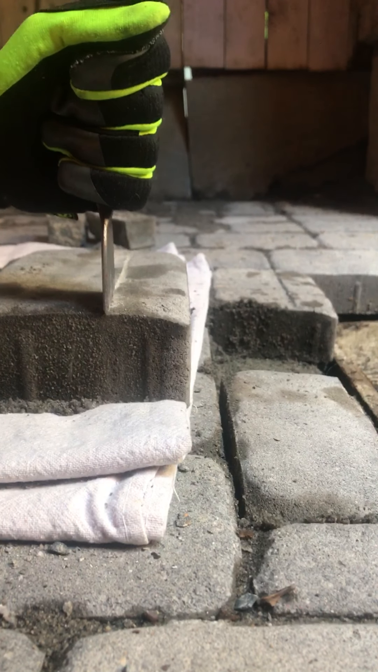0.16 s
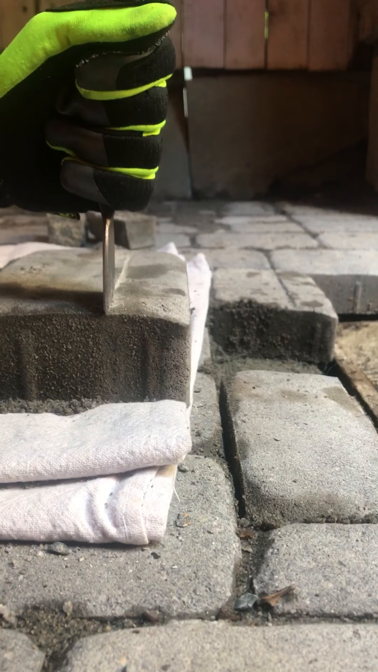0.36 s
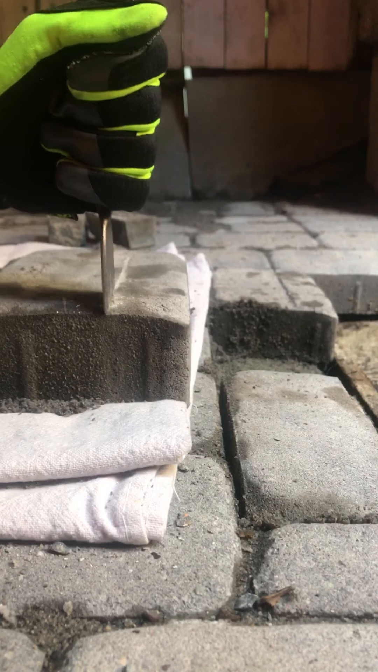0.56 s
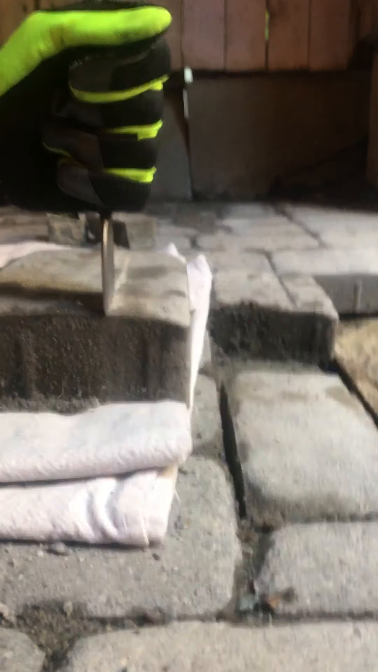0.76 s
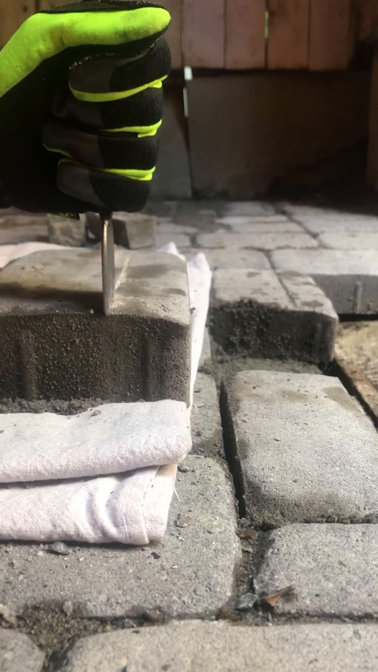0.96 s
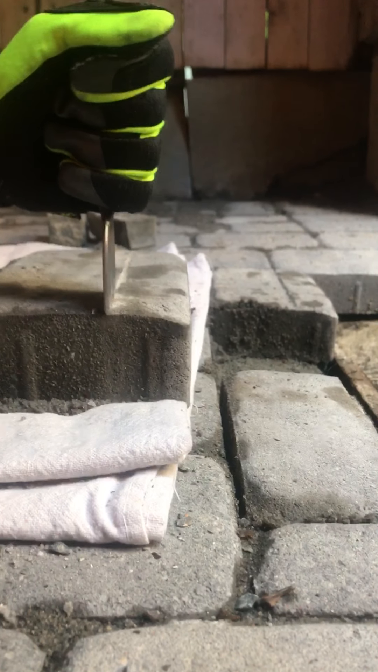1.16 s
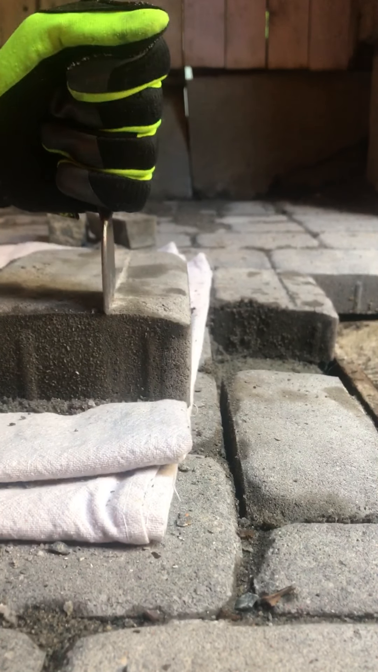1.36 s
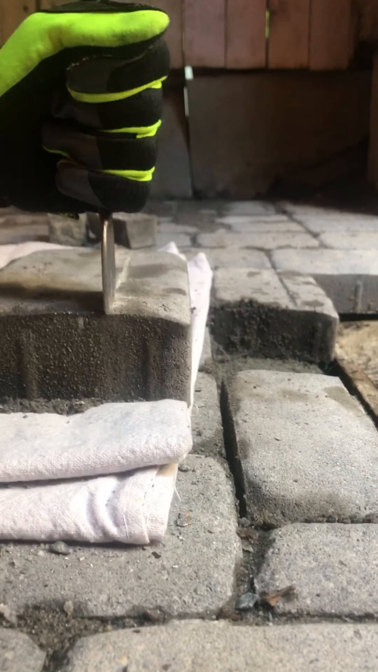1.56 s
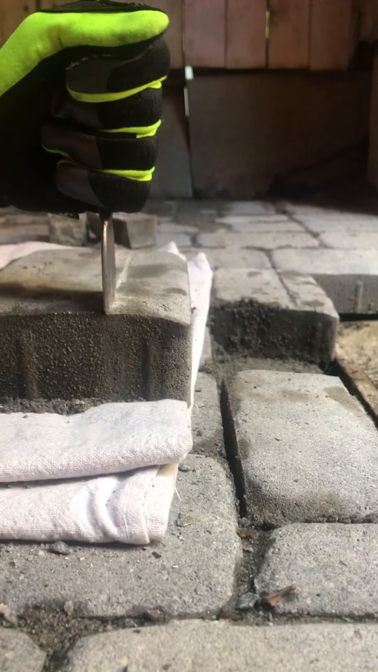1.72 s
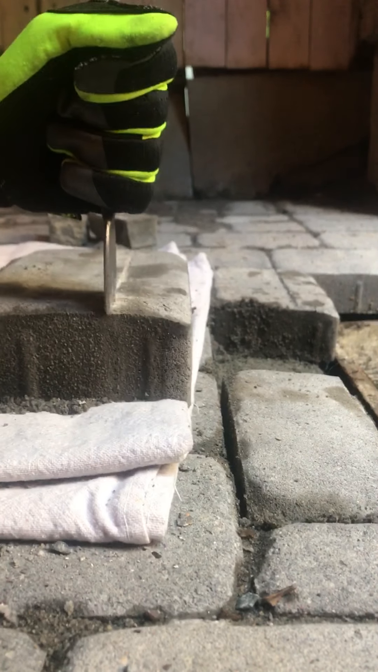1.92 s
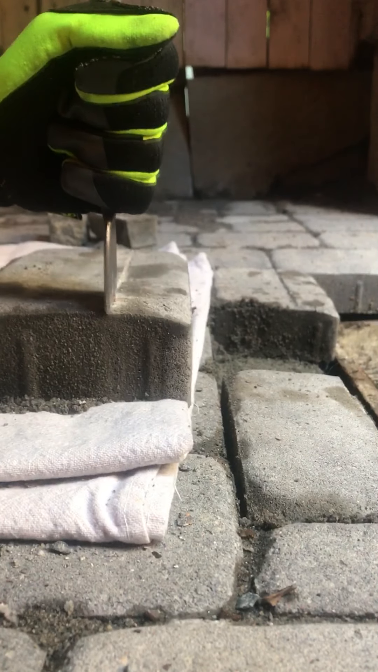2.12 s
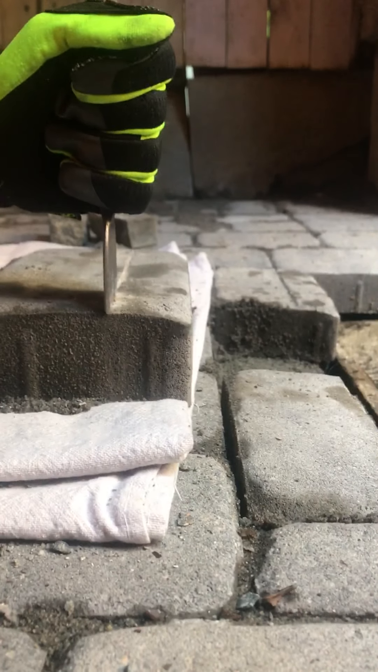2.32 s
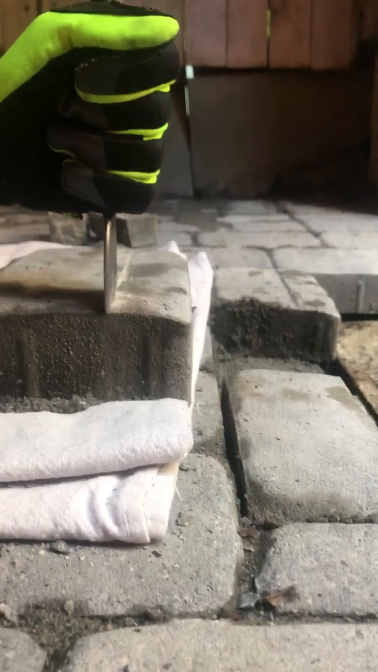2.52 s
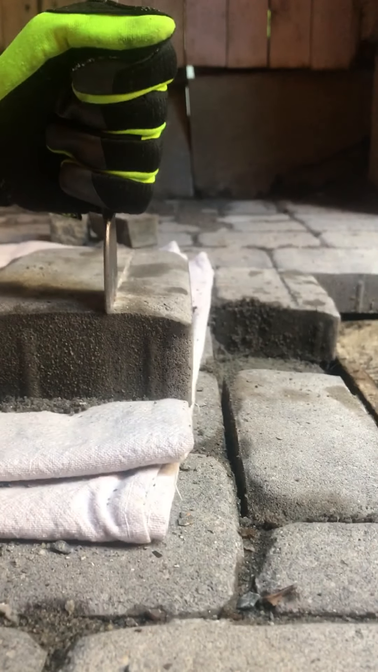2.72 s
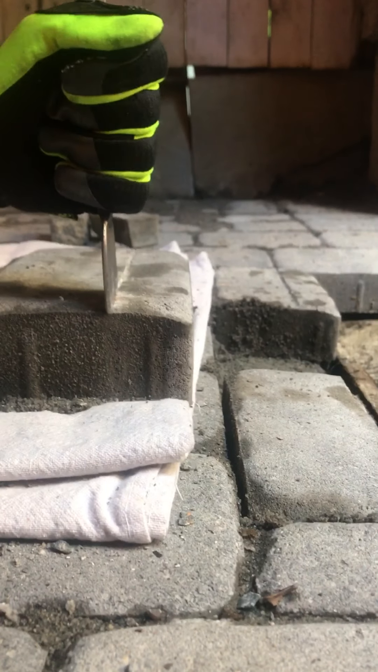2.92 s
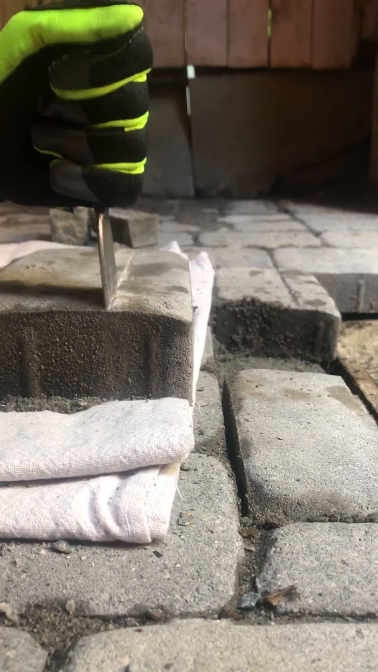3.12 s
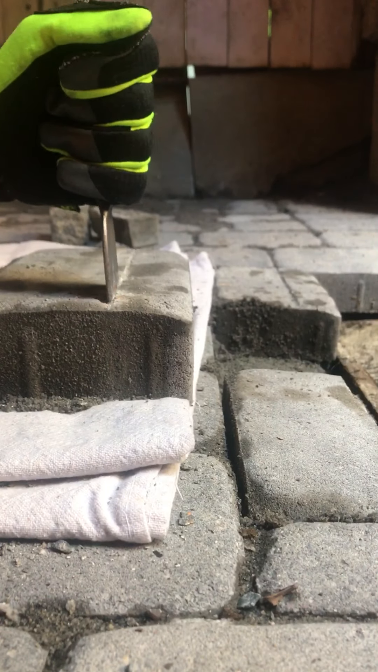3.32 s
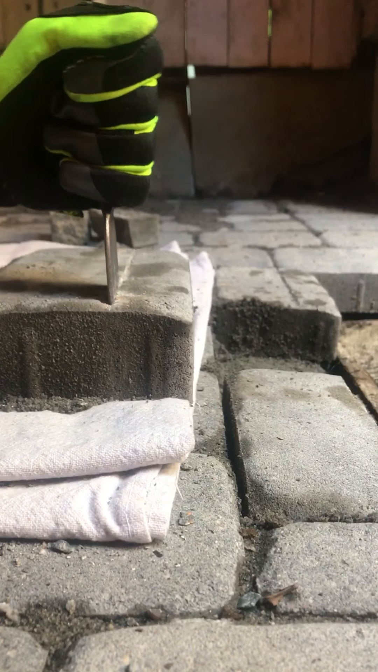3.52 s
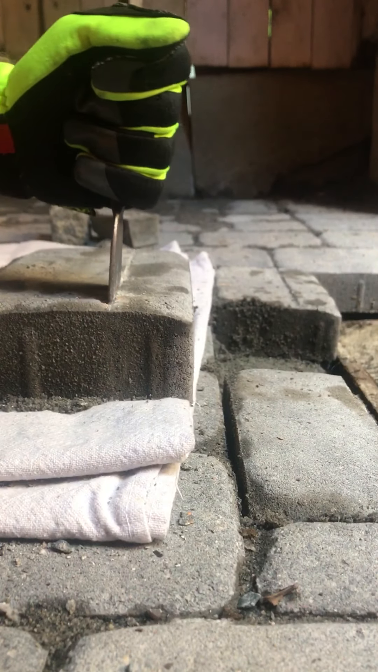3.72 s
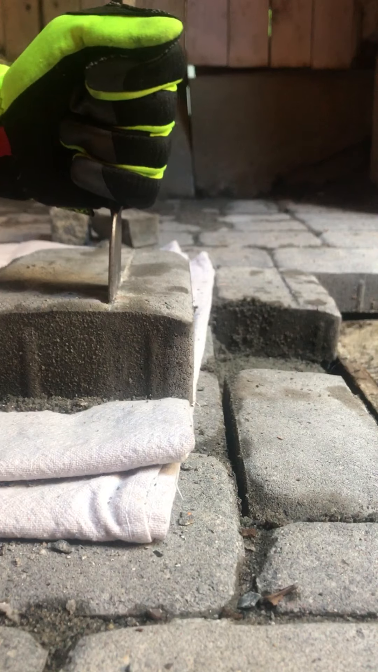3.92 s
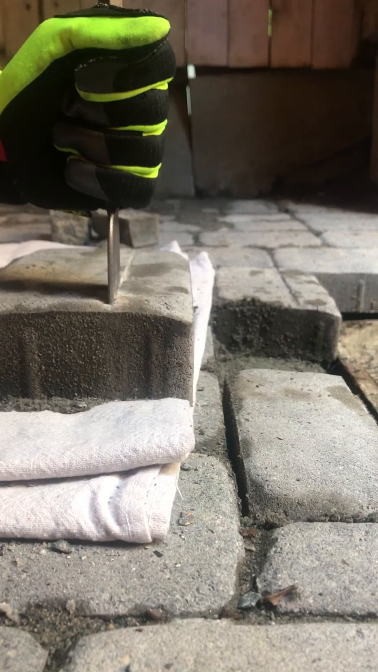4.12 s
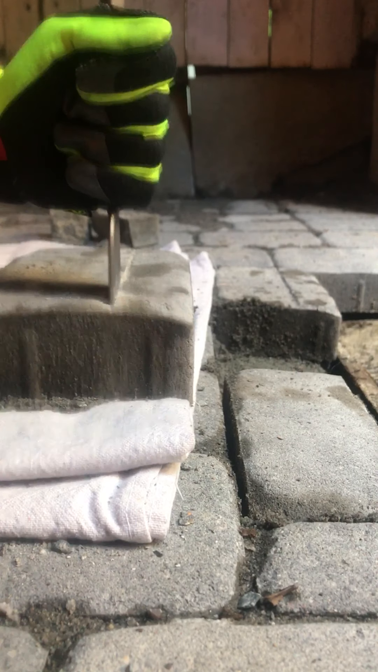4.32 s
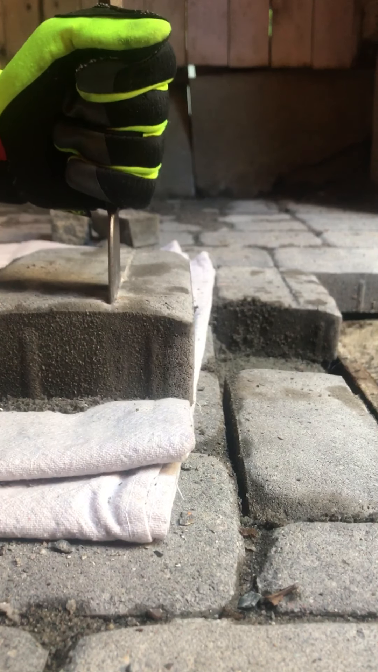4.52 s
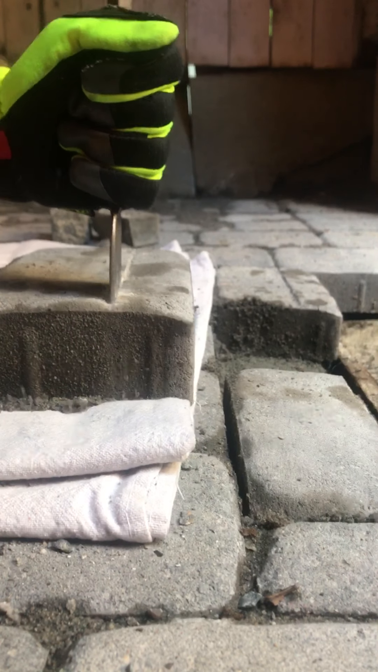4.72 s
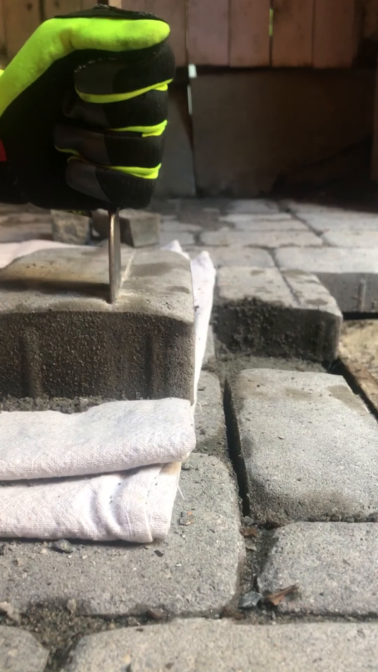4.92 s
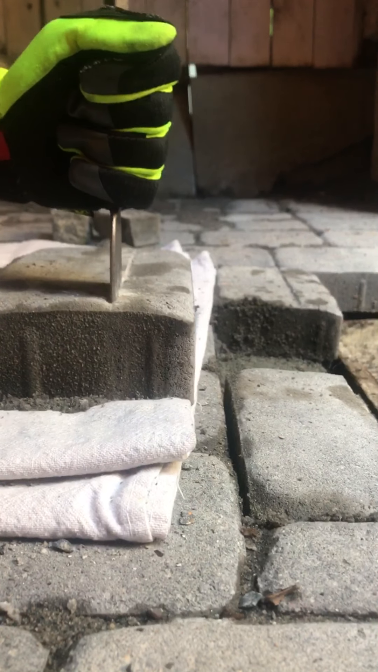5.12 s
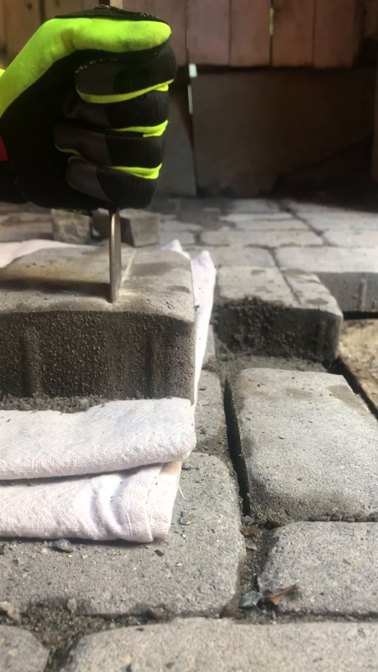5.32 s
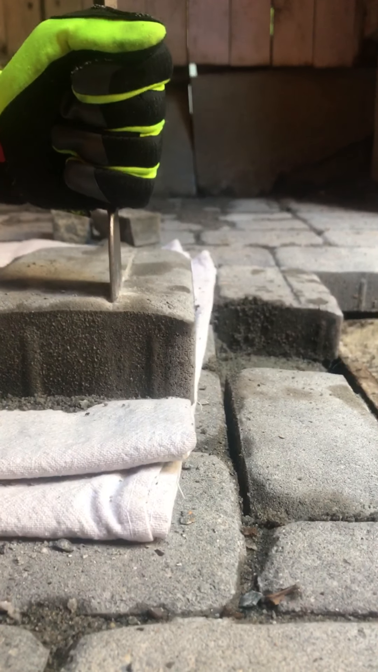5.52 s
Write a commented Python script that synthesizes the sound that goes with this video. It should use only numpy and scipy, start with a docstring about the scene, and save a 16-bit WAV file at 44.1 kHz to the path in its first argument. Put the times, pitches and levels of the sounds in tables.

```python
"""Hammer and chisel in a walled yard

A hammer drives a steel chisel into a paving slab: each blow is a noisy crack, a short ring of damped
sines for the steel and a lower set for the slab, repeated brightly 4.2 ms later as the hammer rebounds,
then answered by duller wall echoes, fading noise and yard air. In the pause, soft bursts and steady
noise make the blade tick and drag on the stone.
Far traffic is filtered noise: an uneven rumble and a smoother rush of tyres.
"""
import sys
import numpy as np
from scipy import signal
from scipy.fft import rfft, irfft, next_fast_len
from scipy.io import wavfile
from scipy.ndimage import map_coordinates

SR = 44100
rng = np.random.default_rng(int(sys.argv[2]) if len(sys.argv) > 2 else 0)


def invert_db(level):
    """Linear amplitude ratio for a level in decibels (20 dB per decade), elementwise."""
    return 10 ** (np.asarray(level, dtype=float) / 20)


def unload_wav(signal):
    """Save mono or channel-first audio to the path in sys.argv[1] as 16-bit WAV at rate SR, clipped to [-1, 1]."""
    wavfile.write(
        sys.argv[1],
        SR,
        np.round(np.clip(np.atleast_2d(signal).T, -1, 1) * 32767).astype(np.int16),
    )


N = 250047

# The notes of the chisel's steel: pitch_hz, relative level_db, fade_s (time to fall 60 dB, scaled at each use)
CHISEL_NOTES = [(2963, -6.5, 0.034), (3643, -4.5, 0.032), (4070, -5.5, 0.036), (4333, -5, 0.17),
                (4795, 1.5, 0.13), (4673, -2, 0.12), (5000, -11, 0.099), (5240, -9.5, 0.092),
                (5830, -12, 0.07), (6155, -2, 0.13), (6510, -10.5, 0.056), (6830, -11.5, 0.11),
                (7300, -11, 0.066), (7810, -5, 0.047), (7970, -5, 0.15), (8077, 0, 0.088), (8740, 0, 0.078),
                (8500, -4.5, 0.16), (9110, -1.5, 0.1), (9760, -5, 0.091), (10635, -4, 0.14),
                (10870, 1, 0.059), (11470, -4.5, 0.066), (12430, -7, 0.18), (13200, -14.5, 0.034),
                (14140, -13.5, 0.055), (13500, -3.5, 0.076), (14600, -1.5, .05), (15800, -12.5, .05)]
CHISEL_HZ = np.array(CHISEL_NOTES)[:, :1]
GROUND_LEAD_S = 0.001157  # the thud through the paving arrives before the crack through the air


def blows():
    """Hammer blows: steel cracks on steel, the chisel rings, the slab thuds and the yard's air booms."""
    # All of much the same force: start_s, relative chisel ring level_db, lean (0 upright to 1 tilted)
    hits = [(0.0552, -11.5, 0.5), (0.3997, -9, 0.31), (0.7481, -18.5, 0.2), (1.1006, -13, 0.18),
            (1.4424, -19, 0), (1.8061, -9.5, 0.42), (2.1515, -9.5, 0.45), (2.4912, -13.5, 0.31),
            (2.831, -13, 0.09), (3.9977, -14, 0.74), (4.3421, -8.5, 0.88), (4.6788, -9, 0.91),
            (5.02, -10.5, 0.85), (5.3604, -14, 1)]
    # Each blow's first instants are faintly heard ahead of it: time ahead_s, level_db
    ahead = [(.0232, -24.5), (.0116, -31)]
    travel_s = 0.15 / 343  # 0.15 m through the air at 343 m/s
    out, t = np.zeros(N), np.arange(SR // 4) / SR
    for start_s, ring_db, lean in hits:
        blow = np.zeros(SR)
        add(blow, GROUND_LEAD_S, crack(t))
        add(blow, GROUND_LEAD_S, chisel_ring(t, ring_db, lean))
        add(blow, 0, slab_thud(t))
        add(blow, 0, air_boom(np.arange(SR) / SR))
        arrival_s = start_s + travel_s - GROUND_LEAD_S
        add(out, arrival_s, blow)
        opening = coloured(blow[:len(t)], [(150, -1), (600, -0.5), (16000, -2)])
        opening *= np.exp(-(t / 0.0065) ** 2)  # only the first few ms remain
        for ahead_s, level_db in ahead:
            add(out, arrival_s - ahead_s, invert_db(level_db) * opening)
    return out


def crack(t):
    """Steel strikes steel: a very short rattle of noise with its own colour, answered by the yard."""
    # Colour of the crack: pitch_hz, level_db
    crack_colour = [(350, -24), (700, -5.5), (1400, -4), (2000, -4), (2600, -7.5), (3600, -6), (4500, -1.5),
                    (6000, -3), (9000, -9), (12000, -5.5), (15500, -10.5)]
    burst = invert_db(11) * coloured(chatter(t, t60=0.0022), crack_colour)
    return yard(burst, near_db=-8, wet_db=7, far_db=-21.5)


def chisel_ring(t, ring_db, lean):
    """The struck bar sounds its own notes, cut short in the glove; its lean changes their balance."""
    # How the lean weights the notes: pitch_hz, upright level_db, tilted level_db
    lean_balance = [(4140, 0, 6), (4700, 8, -13), (6660, -10, 6.5), (8050, -12, 5), (8400, -4.5, -4),
                    (12000, -5, -8)]
    balance = [(hz, upright + lean * (tilted - upright)) for hz, upright, tilted in lean_balance]
    level_db = ring_db + along(balance, CHISEL_HZ) + rng.normal(0, 1.5, CHISEL_HZ.shape)
    # The grip detunes the bar a little: only the pitch column changes
    notes = CHISEL_NOTES * (1 + rng.normal(0, 0.0012, CHISEL_HZ.shape) * [1, 0, 0])
    chime = ring(notes, level_db - 4, t, life=0.29)
    chime *= 1 - np.exp(-t / 0.0004)
    return yard(chime, near_db=-6, wet_db=1.5, far_db=-28)


def slab_thud(t):
    """The slab's damped notes, plus bending waves that cross the stone treble first as a falling tone."""
    # The slab, damped by the cloth under it: pitch_hz, relative level_db, fade_s (time to fall 60 dB)
    slab_notes = [(158.5, 1.5, 0.054), (211.2, 6, 0.044), (301.9, 0.5, 0.077), (558.6, -1, 0.073),
                  (674, -0.5, 0.046), (792, -7, 0.025), (890, -2, 0.041), (1105, -5.5, 0.037),
                  (1298, -10.5, 0.031), (1834, -27.5, 0.015), (2213, -12, 0.025), (2960, -34, .04)]
    from_hz, to_hz, sweep_s = 1600, 520, 0.002  # the pitch nears to_hz with time constant sweep_s
    bend_db, bend_t60_s = -5.5, 0.022
    knock = ring(slab_notes, -14 + rng.normal(0, 1.8, (len(slab_notes), 1)), t)
    knock *= 1 - np.exp(-t / 0.00098)
    turns = to_hz * t + (from_hz - to_hz) * sweep_s * (1 - np.exp(-t / sweep_s))
    bend = invert_db(bend_db - 60 * t / bend_t60_s) * np.sin(2 * np.pi * turns)
    add(knock, GROUND_LEAD_S, bend)
    return signal.fftconvolve(knock, rebound_and_echoes(near_db=-5.5))


def air_boom(t):
    """Air standing between the walls hums at its own low notes after each blow."""
    # Notes of the air: pitch_hz, relative level_db, fade_s (time to fall 60 dB, before the scaling below)
    air_notes = [(53.3, -29, 1.6), (65.57, -23.5, 2), (121, -41, 0.62), (161, -53.5, 0.75),
                 (173.1, -14, 0.48), (201, -14, 0.66), (217, -18, 0.6), (245, -20.5, 0.9),
                 (288.3, -11, 0.44), (304, -43.5, 0.29), (333.1, -2, 0.21), (355.9, -4, 0.24),
                 (394.4, -10.5, 0.33), (444.5, -22.5, 0.44), (600, -23.5, 0.16), (664, -9, 0.043),
                 (789.5, -13, 0.29), (930, -39, 0.081), (1142, -33, 0.058), (1073, -9, 0.26),
                 (1308, -17.5, 0.35)]
    boom = ring(air_notes, -15 + rng.normal(0, 1.5, (len(air_notes), 1)), t, life=0.85)
    return boom * (1 - np.exp(-t / 0.0028))  # standing waves need a few crossings to build


def blade():
    """In the pause the blade touches the stone again and again and drags along it."""
    # Touches: start_s, relative low knock level_db, relative chisel ring level_db
    touches = [(3.049, -40.5, -53.5), (3.142, -54, -60), (3.1483, -37, -53), (3.206, -46, -61),
               (3.2859, -69, -64), (3.3215, -44, -58.5), (3.337, -38, -54), (3.4562, -51, -68),
               (3.4894, -52, -71), (3.5928, -49, -66), (3.646, -44, -57.5), (3.7994, -61, -76)]
    out, t = np.zeros(N), np.arange(SR // 4) / SR
    for start_s, knock_db, ring_db in touches:
        add(out, start_s, tick(t, knock_db, ring_db))
    return out + drag(t)


def tick(t, knock_db, ring_db):
    """A light touch rings the chisel, knocks on the stone and crushes a little grit."""
    # Colour of a light touch: pitch_hz, level_db
    touch_colour = [(4000, -43.5), (6500, 7), (8700, -1.5), (10800, -0.5), (14000, -3)]
    # A light touch at the edge hardly moves the low notes
    edge_db = along([(5000, -19), (6000, 4)], CHISEL_HZ)
    note_db = ring_db + along(touch_colour, CHISEL_HZ) + edge_db + rng.normal(0, 3.1, CHISEL_HZ.shape)
    bar = ring(CHISEL_NOTES, note_db + 5, t, life=0.15)
    chime = signal.fftconvolve(scrape(t, rise_s=0.003, t60=0.033), bar)[:len(t)]
    knock_colour = [(900, -54), (1700, -3.5), (2400, -16), (3500, -11.5), (5000, -22.5), (9000, -36)]
    knock = coloured(scrape(t, rise_s=0.003, t60=0.047), knock_colour)
    grit = coloured(scrape(t, rise_s=0.003, t60=0.03), touch_colour)
    touch = chime + knock * invert_db(knock_db + 35) + grit * invert_db(ring_db + 23)
    return yard(touch, near_db=-34, wet_db=-7.5, far_db=-14)  # near_db makes the second contact very faint


def drag(t):
    """Sliding over the stone excites the steel steadily: uneven noise sets the chisel's notes ringing."""
    from_s, to_s, fade_s = 3.14, 3.7, 0.029
    level_db, uneven_db = -70.5, 5
    # Notes that move the edge sound loudest: (pitch_hz, level_db)
    edge_db = along([(5000, -22.5), (6200, -9), (7400, -31.5), (9000, -2), (10800, 13),
                     (12000, -8), (14200, 5)], CHISEL_HZ)
    grains = rng.standard_normal(N) * invert_db(5.3 * wobble(90))
    slide = unit(signal.fftconvolve(grains, ring(CHISEL_NOTES, edge_db, t, life=1.5))[:N])
    corners_s = [from_s - fade_s, from_s, to_s, to_s + fade_s]
    sliding = np.interp(np.arange(N) / SR, corners_s, [0, 1, 1, 0])
    return slide * sliding * invert_db(level_db + uneven_db * wobble(20))


def traffic():
    """Far traffic: an uneven low rumble and a smoother rush of tyres, both coloured noise."""
    # Levels over time, before the small wobble: time_s, rumble level_db, tyre rush level_db
    traffic_levels = [(0.0, -42, -47), (0.14, -42.5, -50.5), (0.81, -49.5, -56), (0.95, -46, -55),
                      (2.53, -47.5, -57.5), (2.75, -48, -56), (3.11, -46, -55), (3.63, -42.5, -53),
                      (4.25, -40.5, -50.5), (4.86, -46, -55), (5.27, -46, -56), (5.67, -46.5, -56.5)]
    # Colour of the rumble: pitch_hz, relative level_db per Hz
    rumble_colour = [(12, -74.5), (20, -54), (43, -4), (107, -3.5), (189, -8), (222, -4.5), (304, -15.5),
                     (353, -17), (400, -15), (520, -51.5), (880, -120)]
    # Colour of the tyre rush: pitch_hz, relative level_db per Hz
    rush_colour = [(180, -27), (300, -8), (417, -16), (543, -11), (680, -21), (794, -17), (863, -15),
                   (1670, -28), (1870, -28.5), (4880, -45.5), (15500, -53)]
    rumble_db, rush_db = curves(traffic_levels)
    rumble = unit(coloured(rng.standard_normal(N), rumble_colour)) * invert_db(rumble_db + 2 * wobble(6))
    rush = unit(coloured(rng.standard_normal(N), rush_colour)) * invert_db(rush_db + wobble(4.5))
    return rumble + rush


def yard(sound, near_db, wet_db, far_db):
    """A bright second contact, duller wall echoes, the yard's dense tail and the street's slow dull tail."""
    # The yard's tail: pitch_hz, fade_s (time to fall 60 dB)
    yard_fade = [(300, 0.37), (2000, .25), (5000, 0.21), (13000, 0.21)]
    # The tail from far house fronts: pitch_hz, fade_s (time to fall 60 dB)
    street_fade = [(300, 0.31), (2000, 2.2), (8000, 1.6), (13000, 0.27)]
    # Rough walls return less treble: pitch_hz, level_db
    wall_colour = [(300, 2), (3000, 0), (8000, -1.5), (14000, -4)]
    answer = invert_db(far_db) * tail(street_fade, count=SR)
    add(answer, 0.003, invert_db(wet_db) * tail(yard_fade, count=SR // 2))
    spikes, first = rebound_and_echoes(near_db), round(SR / 200)
    add(answer, first / SR, spikes[first:])
    answer = coloured(answer, wall_colour)
    add(answer, 0, spikes[:first])  # the direct sound and the second contact keep their treble
    return signal.fftconvolve(sound, answer)


def rebound_and_echoes(near_db):
    """Single spikes: the direct sound, a second contact as the hammer rebounds, then the wall echoes."""
    # The second contact (first row), then the wall echoes: delay_ms, level_db (near_db is added)
    repeats = [(4.2, 4), (6.6, -24.5), (10.2, -3.5), (12.4, -1.5), (13.8, -1.5), (25, -8), (28, -8.5),
               (39, -7)]
    out = np.zeros(SR // 10)
    out[0] = 1
    for delay_ms, level_db in repeats:
        out[round(delay_ms * SR / 1000)] = invert_db(level_db + near_db)
    return out


def tail(decay, count):
    """A diffuse answer of energy 1: noise in which each frequency dies at its own speed."""
    hz, t, z = signal.stft(rng.standard_normal(count), SR, nperseg=128)
    fading = z * invert_db(-60 * t / along(decay, hz)[:, None])
    out = signal.istft(fading, SR, nperseg=128)[1][:count]
    return out / np.linalg.norm(out)


def ring(modes, gain_db, t, life=1):
    """Damped sines that start at the contact, neighbours in opposite step; life scales their fade time."""
    hz, db, t60 = np.transpose(modes)[:, :, None]
    step = (-1) ** np.arange(len(modes))[:, None]
    level = invert_db(db + gain_db - 60 * t / (t60 * life))
    return (step * level * np.sin(2 * np.pi * hz * t)).sum(axis=0)


def chatter(t, t60):
    """A hard contact of energy 1: a firm first touch, then a short rattle."""
    grit = rng.standard_normal(len(t)) * invert_db(-60 * t / t60)
    grit[:3] = 1.5
    return grit / np.linalg.norm(grit)


def scrape(t, rise_s, t60):
    """A soft contact of energy 1: grit swells under the edge and fades."""
    grit = rng.standard_normal(len(t)) ** 3  # cubing makes a few grains stand out
    grit *= (1 - np.exp(-t / rise_s)) * invert_db(-60 * t / t60)
    return grit / np.linalg.norm(grit)


def coloured(x, spectrum):
    """x through a causal (minimum-phase) filter with the given (Hz, dB) shape."""
    m = next_fast_len(len(x) + 4096)
    gain = invert_db(along(spectrum, np.fft.rfftfreq(m, 1 / SR)))
    cep = irfft(np.log(gain + 1e-6), m)
    # Folding the cepstrum onto its first half puts the response after the input
    cep[1:m // 2] *= 2
    cep[m // 2 + 1:] = 0
    return irfft(rfft(x, m) * np.exp(rfft(cep)), m)[:len(x)]


def unit(x):
    """Scaled to rms 1."""
    return x / np.sqrt(np.mean(x ** 2) + 1e-20)


def along(points, hz):
    """(Hz, value) points read on a log frequency axis."""
    f, v = np.transpose(points)
    return np.interp(np.log(hz + 1), np.log(f + 1), v)


def curves(rows):
    """One value per sample for each column after the time."""
    s, *cols = np.transpose(rows)
    return [np.interp(np.arange(N) / SR, s, c) for c in cols]


def wobble(rate):
    """A smooth random curve, rate knots a second."""
    knots = rng.standard_normal(int(N * rate / SR) + 4)
    return map_coordinates(knots, [np.arange(N) * rate / SR])


def add(track, s, sound):
    """Mixes a sound into the track at time s, cut at the track's end."""
    part = track[round(s * SR):][:len(sound)]
    part += sound[:len(part)]


def scene():
    """Everything in the yard, one channel."""
    return (blows() + blade() + traffic())[None]


def band_limit(x):
    """A steep low-pass at the top of the band."""
    return signal.sosfilt(signal.butter(12, 16800, fs=SR, output="sos"), x)


def record(dry):
    """The loudest peaks round off near full scale, then the highest treble is removed."""
    rounded = dry / (1 + np.abs(dry / 0.99) ** 5) ** (1 / 5)
    low_pass = signal.cheby2(12, 50, 16250, fs=SR, output="sos")  # stops everything from 16250 Hz up
    limited = signal.sosfiltfilt(low_pass, rounded)
    return band_limit(limited)


dry = scene()
out = record(dry)
unload_wav(out)
```